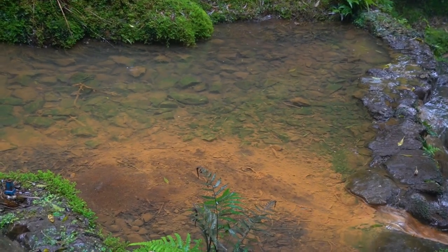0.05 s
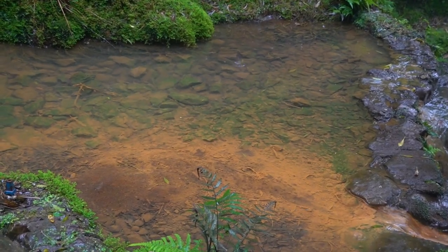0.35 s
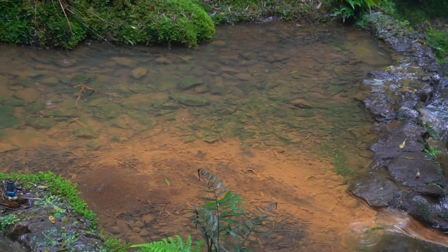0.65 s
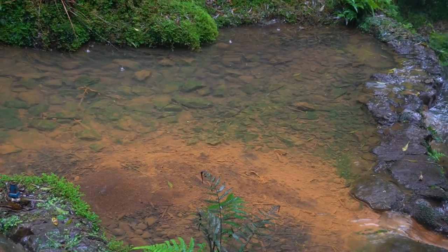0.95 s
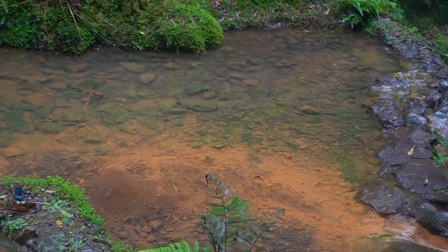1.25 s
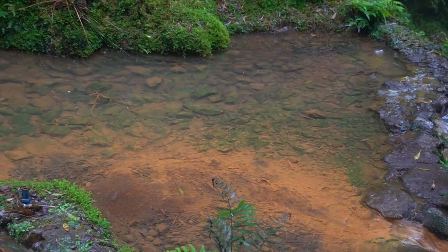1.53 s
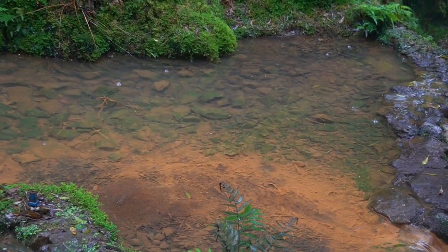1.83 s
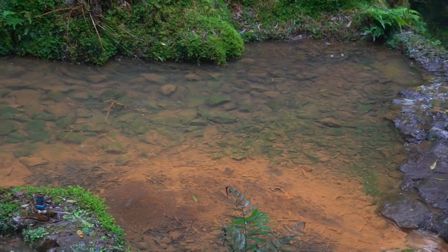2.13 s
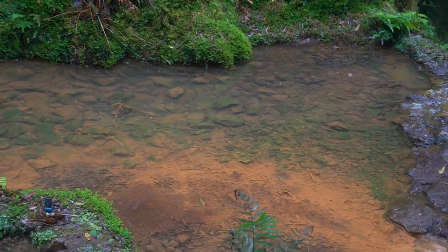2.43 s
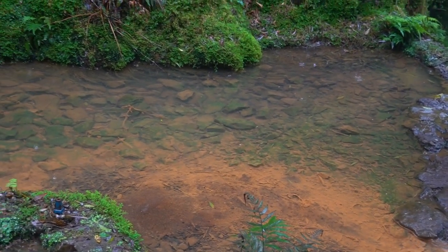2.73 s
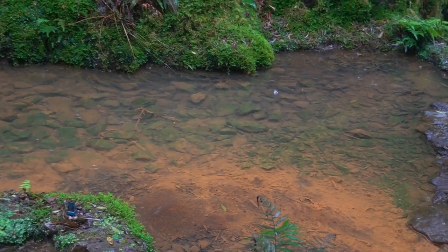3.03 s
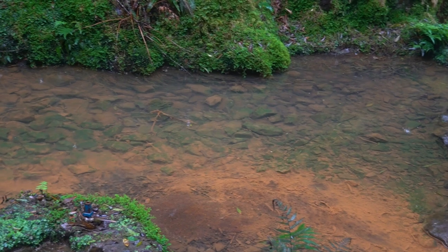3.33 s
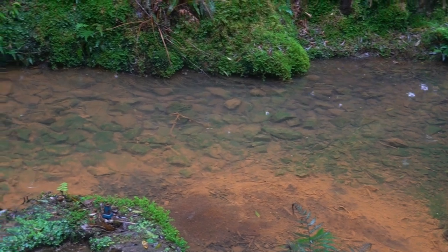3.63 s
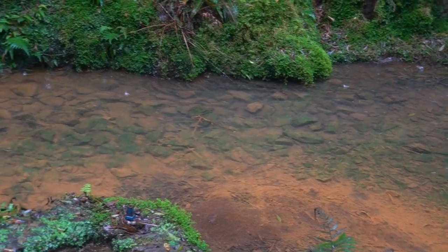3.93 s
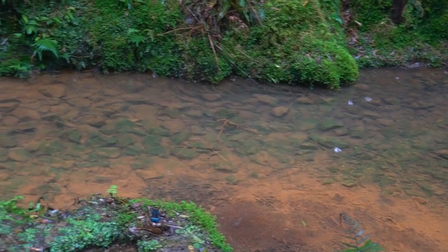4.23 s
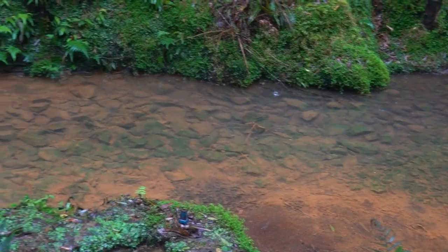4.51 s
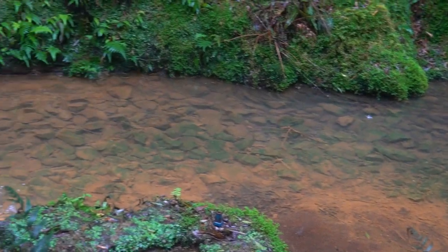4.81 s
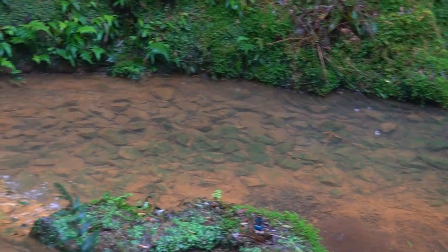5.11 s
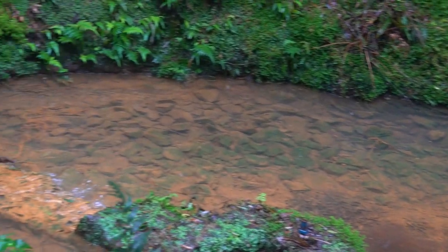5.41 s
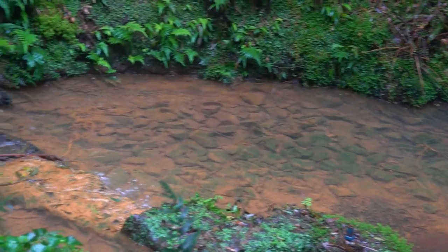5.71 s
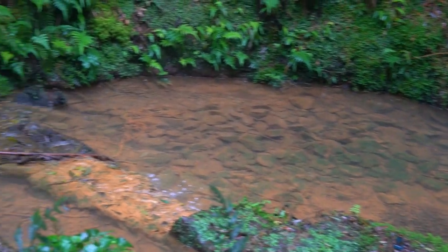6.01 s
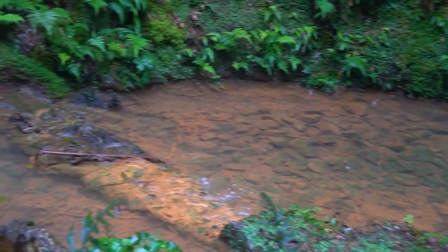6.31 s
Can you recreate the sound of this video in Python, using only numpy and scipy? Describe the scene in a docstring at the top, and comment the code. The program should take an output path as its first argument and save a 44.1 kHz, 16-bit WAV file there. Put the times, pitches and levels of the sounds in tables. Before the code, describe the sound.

A shallow stream hisses and gurgles over stones, spread wide in front of the microphone. Close by, slightly right, frogs give short rattling calls made of rapid clicks, and a fainter frog answers from further along the bank. The calls crowd together midway, mixed with lower, falling croaks and a few small plops. After a pause with mostly water, a softer rattle returns. The mossy gully adds a short echo.

```python
"""A small stream hisses, fizzes and gurgles over stones, spread wide in front of the microphone.
Frogs join in around a shallow pool in a mossy gully: their rattling calls are runs of notes,
each a few sharp clicks that ring the vocal sac. One frog calls from further along the bank, and
lower, falling croaks cut in, pulsed through the throat. The banks give the frogs a short echo."""
import sys
import numpy as np
from scipy import signal
from scipy.fft import rfft, irfft
from scipy.io import wavfile
from scipy.ndimage import uniform_filter1d

SR = 44100
rng = np.random.default_rng(int(sys.argv[2]) if len(sys.argv) > 2 else 0)


def pcm_store(signal):
    """Save signal as 16-bit PCM."""
    levels = np.round(np.clip(np.atleast_2d(signal), -1, 1) * 32767)
    wavfile.write(sys.argv[1], SR, levels.astype(np.int16).T)


N = 284733


def undb(db):
    """Decibels to gain."""
    return 10 ** (np.asarray(db) / 20)


def level(x, db):
    """Set the rms level."""
    return x * undb(db) / np.sqrt(np.mean(x ** 2))


def pan(db):
    """Left and right gains for a left minus right difference in dB, steady or moving."""
    return undb(np.array([[1], [-1]]) * db / 2)


def add(out, start_s, sound):
    """Mix a sound in from its start time."""
    i = max(int(start_s * SR), 0)
    part = sound[..., :max(N - i, 0)]
    out[..., i:i + part.shape[-1]] += part


def ring(t, hz, t60):
    """A resonance struck at t = 0, dying by 60 dB in t60 seconds."""
    t = np.maximum(t, 0)
    return np.sin(2 * np.pi * hz * t) * np.exp(-np.log(1000) * t / t60)


def colour(x, points):
    """Filter by a spectrum of (frequency [Hz], gain [dB]) points."""
    hz, db = np.transpose(points)
    bin_hz = np.maximum(np.arange(N // 2 + 1) * SR / N, 1)
    return irfft(rfft(x) * undb(np.interp(np.log(bin_hz), np.log(hz), db)), N)


def band(x, low_hz, high_hz, order=2):
    """Causal band-pass."""
    return signal.sosfilt(signal.butter(order, [low_hz, high_hz], "band", fs=SR, output="sos"), x)


def walk(rate_hz):
    """Random values held for 1 / rate_hz seconds and smoothed twice."""
    hold = int(SR / rate_hz)
    steps = np.repeat(rng.standard_normal(N // hold + 1), hold)
    return uniform_filter1d(uniform_filter1d(steps, hold), hold)[:N]


def wash(spectrum, db):
    """Running water as mid and side noise, narrow in the bass and wide in the treble."""
    # width of the water at the microphone: (frequency [Hz], side minus mid [dB])
    width = [(60, -10), (130, -23), (330, -17), (700, -9), (1300, -6), (2400, -0.5), (4400, -1), (8000, 3),
             (14000, -3)]
    mid, side = (level(colour(rng.standard_normal(N), spectrum), db) for _ in range(2))
    return mid + np.array([[1], [-1]]) * colour(side, width)


def stream(flicker_db=0.85, spray_hz=8000):
    """Water rushing over stones: a flickering low wash and a wide hiss with fine spray on top."""
    # colour of the low wash and of the rush above it: (frequency [Hz], spectral density [dB])
    low_spectrum = [(18, -79), (30, -49), (102, -32), (185, -17), (238, -7), (264, -5), (297, -2.5),
                    (552, -0.5), (700, 1.5), (910, -30), (1540, -120)]
    rush_spectrum = [(350, -43.5), (600, -9), (822, -4.5), (943, -2), (1080, -2), (1290, 1), (1350, 0),
                     (1460, 0), (2490, 0), (2740, -2.5), (3060, -1), (6860, -5.5), (10100, -1), (14200, -4),
                     (15800, -7.5)]
    # the microphone turns from one riffle to the other:
    # (time [s], hiss gain [dB], spray gain [dB], left minus right [dB])
    turn = [(0, 2.5, -1.5, -0.5), (1.5, 2.5, -2.5, -1), (3, 3, -2, -0.9), (4.5, 3, -2, -.5),
            (5.4, 1.5, -1, 0.4), (6.46, 2.5, -1.5, 1)]
    times, *columns = np.transpose(turn)
    hiss_db, spray_db, pan_db = (np.interp(np.arange(N) / SR, times, c) for c in columns)
    low = wash(low_spectrum, db=-45.1) * undb(flicker_db * walk(rate_hz=21.14))
    rush = wash(rush_spectrum, db=-26.8)
    treble = colour(rush, [(spray_hz / 2, -40), (spray_hz, -6), (spray_hz * 1.41, 0)])
    hiss = (rush - treble) * undb(hiss_db + .5 * walk(rate_hz=18)) * pan(0.91)
    spray = treble * undb(spray_db) * pan(-1.1)
    return low + (hiss + spray) * pan(pan_db)


def bubble(hz, t60, rise=0.063):
    """A bubble rings and climbs in pitch as it nears the surface."""
    t = np.arange(int(t60 * SR) + 1) / SR
    return ring(t, hz * (1 + rise * t / t60), t60) * (1 - np.exp(-t * hz))


def gurgle(count=2600, low_hz=380, high_hz=3200, cycles=12, spread_db=4, tilt=0.82, rms_db=-43):
    """Many small bubbles of all sizes, scattered across the stream."""
    out = np.zeros((2, N))
    for when, pitch, strength, side in rng.random((count, 4)):
        hz = low_hz * (high_hz / low_hz) ** pitch
        strength_db = -spread_db * np.log(1 - strength * 15 / 16)  # most are faint, a few stand out
        gain = undb(strength_db) * (hz / high_hz) ** tilt
        add(out, when * N / SR, gain * pan(8 * (side - .5)) * bubble(hz, cycles / hz))
    return level(band(out, 216, 9100), rms_db)


def arch(place, crest, first, top, last, flatness):
    """Curve from the first value through top at the crest of a call to the last."""
    crest = np.clip(crest, .05, .95)
    if place < crest:
        return top + (first - top) * (1 - place / crest) ** flatness
    return top + (last - top) * ((place - crest) / (1 - crest)) ** flatness


def rattle_notes(gap_s=.0078, gap_growth=.25, click_growth=.8, brighten_db=4):
    """The notes of each call: they mostly slow down and brighten; their clicks multiply and spread."""
    # rattling calls at the pool: (first note [s], last note [s], notes, slowing, crest place [0-1],
    # level at first, crest, last [dB], vocal sac at first, crest, last [Hz], clicks per note,
    # sac left minus right [dB], snap [dB], body [dB], lower overtone [Hz], its level [dB],
    # upper overtone [Hz], its level [dB], lingering ring [dB])
    calls = [ (0.584, 0.999, 12, .075, .65, -15, -5, -4.5, 2140, 2480, 2460, 3.2, -6, 2.5, -2.5, 3880, -15.5, 6100, -13, -20),
             (1.039, 1.28, 7, -.16, .4, -8.5, -11, -18, 2366, 2270, 1940, 3, -2, 3, -3.5, 3900, -24, 6100, -28, -17.5),
             (1.51, 1.852, 10, 0.1, 0.43, -20, -11.5, -13.5, 2520, 2500, 2360, 2.5, -2.5, -4, -4, 4650, -11, 7000, -22, -18),
             (1.922, 2.486, 16, 0.05, 0.64, -15, -5.5, -12.5, 1920, 2490, 2220, 2.6, -5.5, 1, -1.5, 3800, -23, 6150, -15.5, -20),
             (2.828, 3.134, 9, 0.06, .65, -17, -8, -7, 2420, 2620, 2260, 3.7, -4, -8, -7, 3900, -24, 6470, -12, -20),
             (3.163, 3.496, 10, 0.02, .4, -13, -8, -16.5, 2120, 2340, 1970, 2, -7, -9, 3, 3900, -10.5, 5950, -17, -20.5),
             (3.531, 3.685, 5, .04, 0.6, -11, -3.5, -2.5, 2410, 2780, 2600, 2.8, -7, -5, -8, 3690, -15, 5900, -15, -23.5),
             (3.722, 3.844, 4, 0, .6, -3.5, -3.5, -3.5, 2330, 2330, 2300, 3.4, -7, -9, -7.5, 3600, -10.5, 5730, -16, -30),
             (4.087, 4.42, 10, 0.03, 0.5, -10, -1.7, -4.5, 2614, 2580, 2380, 2.6, -6, -16, -12.5, 3600, -26, 6000, -27, -25),
             (4.457, 4.617, 5, 0.02, .45, -1, -3.3, -0.7, 2684, 2450, 2340, 3.3, -7, -20, -16, 3820, -21, 6100, -29, -22),
             (4.666, 4.833, 5, 0.01, 0.28, -11, -10.5, -11, 2417, 2480, 2100, 2.8, -7, -16, -4, 3930, -23, 7000, -19, -17),
             (6.264, 6.446, 6, 0.04, 1, -20.5, -15, -14.5, 2570, 2600, 2550, 3.9, -17, -18, -9, 3250, -15, 6700, -13, -23)]
    for start, end, count, slowing, crest, db0, db1, db2, hz0, hz1, hz2, clicks, *voice in calls:
        for place, luck in zip(np.linspace(0, 1, count), rng.standard_normal((count, 5))):
            note_s = start + (end - start) * place * (1 - slowing * (1 - place)) + .001 * luck[0]
            db = arch(place, crest, db0, db1, db2, flatness=3.05) + 0.9 * luck[1]
            hz = arch(place, crest, hz0, hz1, hz2, flatness=1.79) * (1 + 0.0161 * luck[2])
            late = place - .5
            last_gap_s = gap_s * (1 + gap_growth * late + .12 * luck[3])
            click_count = int(round(max(clicks + click_growth * late + .3 * luck[4], 2)))
            yield note_s, db, hz, last_gap_s, click_count, brighten_db * late, voice


def rattles(sac_hold_s=0.0046, swell_s=.0001, stretch=0.35, relax_s=0.00014, sink=0.011, detune=0.015,
            linger_swell_s=0.0017, linger_spread=0.0561, body_hz=1780, chest_hz=1220, body_t60=0.0048,
            early_gap_s=.0054, second_db=-1.7, fade_db=-3.0, scatter_db=0.83, gain_db=0.42):
    """Frogs at the pool: larynx clicks grow louder, lower and further apart, ringing sac and body."""
    out, t = np.zeros((2, N)), np.arange(SR // 12) / SR
    # every click stretches the sac, so its ring starts sharp and settles within a millisecond
    sac_t = t + stretch * relax_s * (1 - np.exp(-t / relax_s))
    sac_shape = (1 - np.exp(-t / swell_s)) * np.exp(-(t / sac_hold_s) ** 4)
    for note_s, db, hz, last_gap_s, clicks, bright_db, voice in rattle_notes():
        pan_db, snap_db, body_db, over_hz, over_db, top_hz, top_db, linger_db = voice
        # k counts back from the note's last click
        for k, (size, *drift) in enumerate(rng.standard_normal((5, 5))[:clicks]):
            tune = 1 + detune * np.array(drift)
            lead_s = min(k, 1) * last_gap_s + max(k - 1, 0) * early_gap_s
            force_db = min(k, 1) * second_db + max(k - 1, 0) * fade_db + scatter_db * size
            # a cluster of weak resonances near the sac's pitch rings on between the notes
            linger = sum(ring(t, hz * (1 + linger_spread * d), t60=0.27) for d in drift) / 2
            sac = ring(sac_t, hz * tune[0] * (1 + sink * (k - 1)), t60=0.015) * sac_shape
            sac += undb(linger_db) * linger * (1 - np.exp(-t / linger_swell_s))
            body = ring(t, body_hz * tune[1], body_t60)
            chest = undb(-3) * ring(t, chest_hz * tune[2], body_t60)
            rest = (undb(body_db) * (body + chest)
                    + undb(over_db) * ring(t, over_hz * tune[2], t60=0.014)
                    + undb(top_db + bright_db) * ring(t, top_hz * tune[3], t60=0.017)
                    + undb(snap_db + bright_db) * ring(t, hz=4200, t60=0.00098))
            # the sac beams to one side of the microphone, the rest spreads more evenly
            click = pan(pan_db) * sac + pan(0.14 * pan_db) * rest
            add(out, note_s - lead_s, undb(db + force_db + gain_db) * click)
    return band(out, 1350, 5850, order=3)


def bank_echo(x, near_db=-9, near_t60=0.051, far_db=-16, far_t60=0.24, swell_s=0.0016):
    """Quick scatter from nearby water and stones, then a faint tail from the mossy slopes."""
    t = np.arange(SR // 2) / SR
    echo = 0
    for db, t60 in ((near_db, near_t60), (far_db, far_t60)):
        envelope = np.exp(-np.log(1000) * t / t60) * (1 - np.exp(-t / swell_s))
        tail = rng.standard_normal((2, len(t))) * envelope
        echo = echo + undb(db) * tail / np.sqrt(np.sum(tail ** 2, axis=1, keepdims=True))
    return signal.fftconvolve(x, echo, axes=1)[:, :N]


def far_frog(notes_per_s=27, clicks=5, click_gap_s=.0055, bend=0.029, top_from_hz=6200, top_to_hz=7100,
             top_db=-4, scatter_db=1.5, pan_db=-5):
    """A rattle off to the right, blurred by distance: its pitch arches and a thin overtone climbs."""
    # calls from further along the bank: (start [s], end [s], level [dB], vocal sac [Hz])
    calls = [(1.50, 1.83, -27, 2580), (2.14, 2.5, -21, 2610), (2.83, 3.126, -21.5, 2585),
             (4.49, 4.796, -22, 2620), (6.27, 6.60, -24, 2660)]
    out, t = np.zeros((2, N)), np.arange(SR // 20) / SR
    for start, end, db, hz in calls:
        for note_s in np.arange(start, end, 1 / notes_per_s):
            place = (note_s - start) / (end - start)
            effort = np.sin(np.pi * (.1 + .8 * place))
            sac = effort * ring(t, hz * (1 + bend * (effort - 1)), t60=0.028)
            top_hz = top_from_hz + (top_to_hz - top_from_hz) * place
            overtone = place * undb(top_db) * ring(t, top_hz, t60=0.019)
            for k, (late, size) in enumerate(rng.standard_normal((clicks, 2))):
                click_s = note_s + (k + 0.27 * late) * click_gap_s
                add(out, click_s, undb(db + scatter_db * size) * pan(pan_db) * (sac + overtone))
    return band(out, 1540, 10000)


def croak_bursts(first_share=0.51, settle=0.26, level_hold=1.7):
    """The bursts of each croak: a short one opens it, then the throat settles towards its last pitch."""
    # low croaks, mostly sinking in pitch: (first burst [s], last burst [s], bursts, burst length [s],
    # level at first, last [dB], throat resonance at first, last [Hz], pulse rate [Hz],
    # left minus right [dB], chest [dB], rasp [dB], unevenness [factor])
    calls = [ (1.613, 1.657, 4, 0.021, -12.5, -14.5, 1860, 1280, 330, 5.5, -2.5, -3, 0.65),
             (3.590, 3.640, 3, 0.019, -5.5, -12.5, 1990, 1300, 345, 4.5, -8, -8, 1.04),
             (3.709, 3.771, 3, .023, -19, -16, 1880, 1170, 318, -2, -10, -12, 0.98),
             (3.861, 3.863, 1, .024, -13, -14, 1760, 1750, 333, 5, -11, -1, 1.1),
             (3.915, 3.991, 4, 0.025, -5.5, -20.5, 2010, 1350, 316, 5.5, -9.5, -14, 1),
             (4.196, 4.231, 2, 0.069, -19.5, -22, 1340, 1850, 309.4, 3.5, -2.5, -9, 1),
             (4.253, 4.332, 4, 0.013, -9.5, -6, 1660, 1400, 263, 4.5, -10.5, -6, 0.96),
             (5.763, 5.856, 4, .019, -18.5, -22, 1730, 1190, 358.5, -8, -16, -18, 0.54)]
    for start, end, count, length_s, db0, db1, hz0, hz1, *voice in calls:
        for k, place in enumerate(np.linspace(0, 1, count)):
            db = db0 + (db1 - db0) * place ** level_hold
            hz = hz1 + (hz0 - hz1) * settle ** k
            yield start + (end - start) * place, length_s * (1 if k else first_share), db, hz, voice


def croaks(pulses=13, chest_ratio=0.48, fall=0.091, jitter=0.098, wobble=0.015, scatter_db=2.4,
           gain_db=-2):
    """Bursts of fast, uneven pulses through a throat resonance that sinks during each burst."""
    out, t = np.zeros((2, N)), np.arange(SR // 50) / SR
    for centre_s, length_s, db, hz, (rate_hz, pan_db, chest_db, rasp_db, uneven) in croak_bursts():
        for k, (late, size, drift) in enumerate(uneven * rng.standard_normal((pulses, 3))):
            offset_s = (k - pulses // 2 + jitter * late) / rate_hz
            place = offset_s / length_s
            throat_hz = hz * (1 - fall * uneven * np.clip(place, -1, 1) + wobble * drift)
            throat = ring(t, throat_hz, t60=0.016)
            chest = undb(chest_db) * ring(t, chest_ratio * throat_hz, t60=0.0092)
            rasp = undb(rasp_db) * ring(t, hz=2200, t60=0.0025)
            gain = undb(db + gain_db + scatter_db * size) * np.exp(-2.8 * place ** 2)
            # neighbouring resonances swing in opposite senses, which fills the valleys between them
            add(out, centre_s + offset_s, gain * pan(pan_db) * (throat - chest - rasp))
    return band(out, 540, 3400, order=3)


def plops():
    """Single low bubbles ring out of the stream, straight ahead of the microphone."""
    # plops in the stream: (time [s], level [dB], bubble pitch [Hz], ring t60 [s])
    bubbles = [(2.712, -25.5, 489, 0.14), (4.331, -28, 430, .03), (4.396, -13.5, 536, 0.018),
               (5.962, -20, 506, 0.02)]
    out = np.zeros((2, N))
    for start_s, db, hz, t60 in bubbles:
        add(out, start_s, undb(db) * bubble(hz, t60))
    return out


def scene():
    """The gully from the poolside: frogs and their echo over the running water."""
    frogs = rattles() + far_frog() + croaks()
    return frogs + bank_echo(frogs) + stream() + gurgle() + plops()


def record(dry, top_hz=15850):
    """The microphone signal is clipped at full scale, then the highest treble is cut steeply."""
    low_pass = signal.ellip(12, .1, 75, top_hz, fs=SR, output="sos")
    return signal.sosfilt(low_pass, np.clip(dry, -1, 1))


dry = scene()
out = record(dry)
pcm_store(out)
```